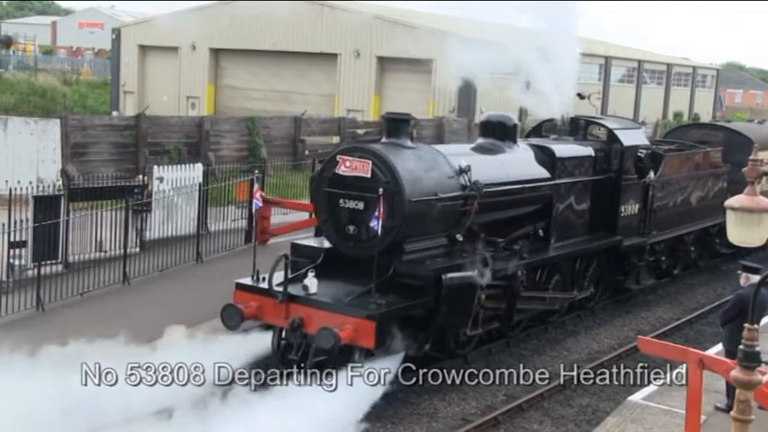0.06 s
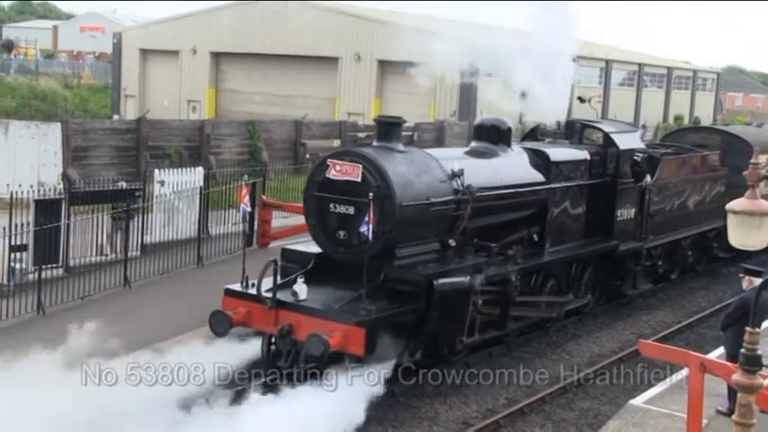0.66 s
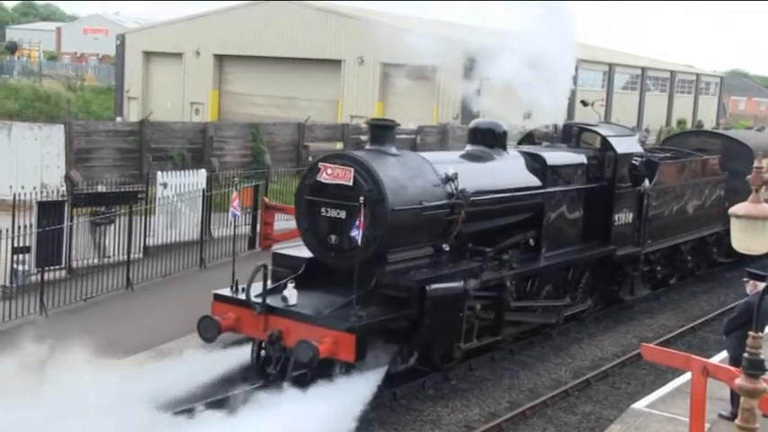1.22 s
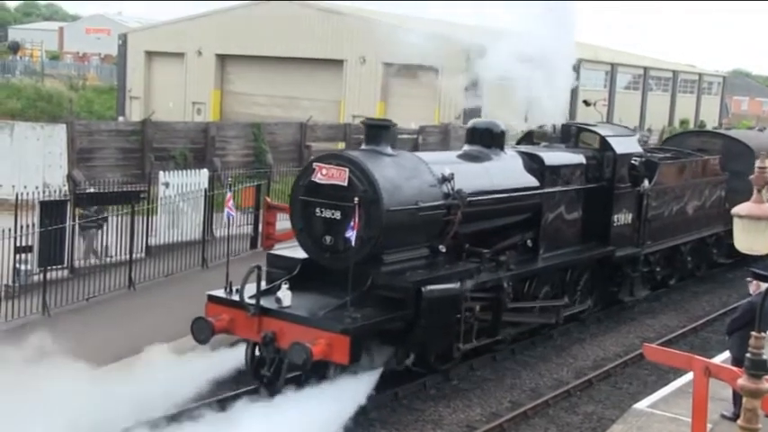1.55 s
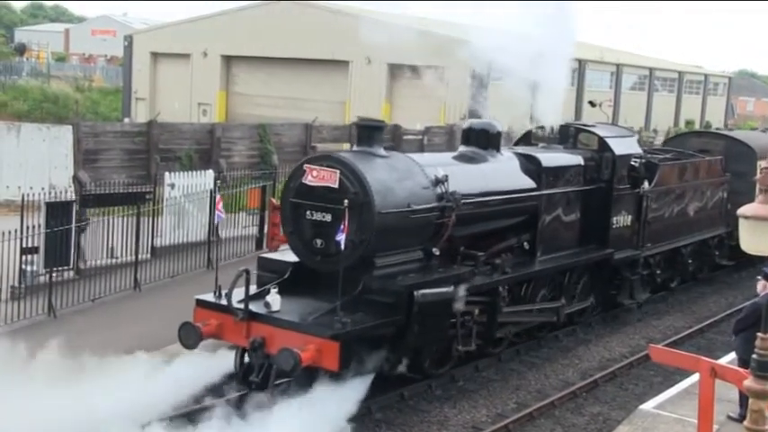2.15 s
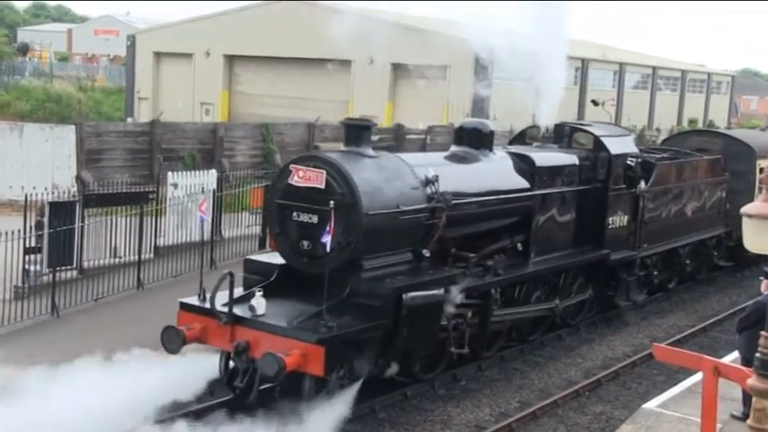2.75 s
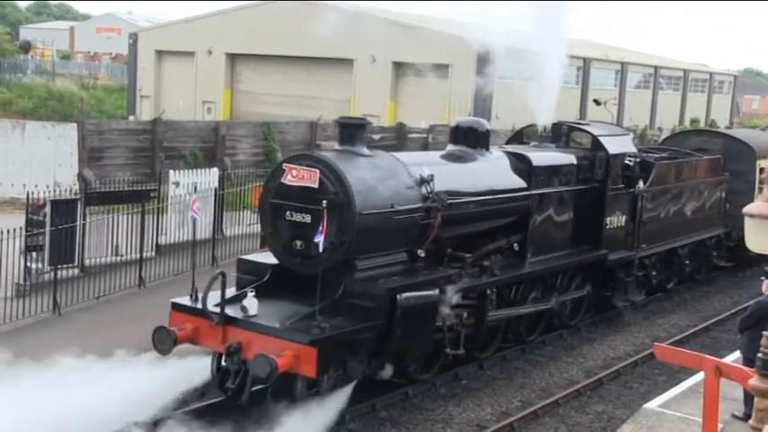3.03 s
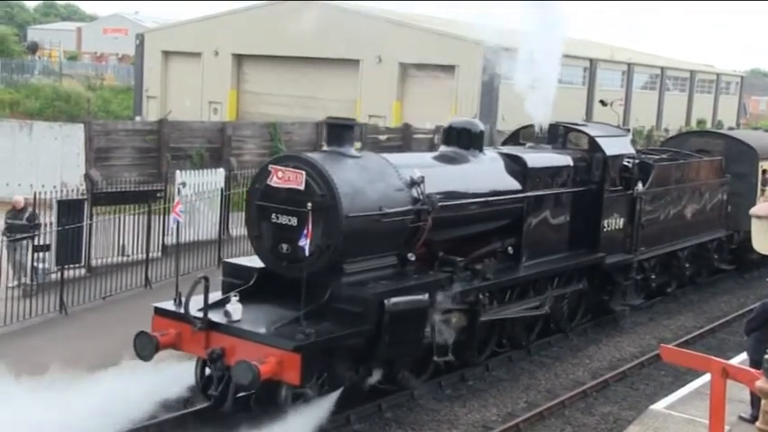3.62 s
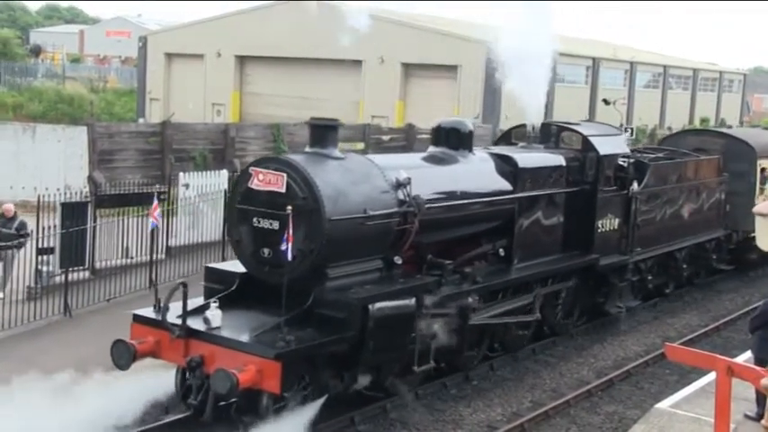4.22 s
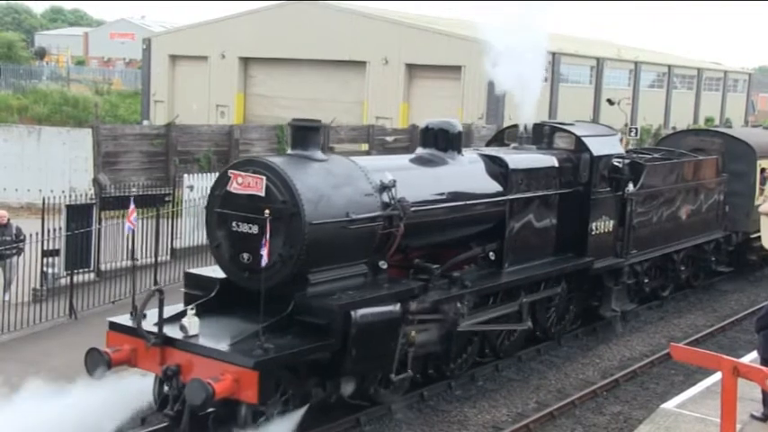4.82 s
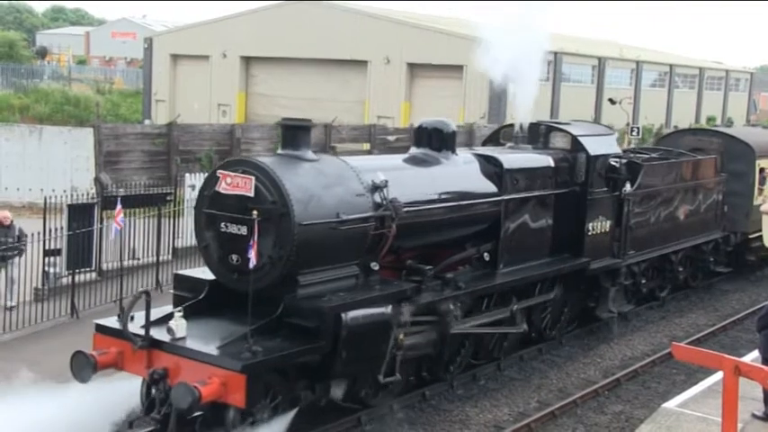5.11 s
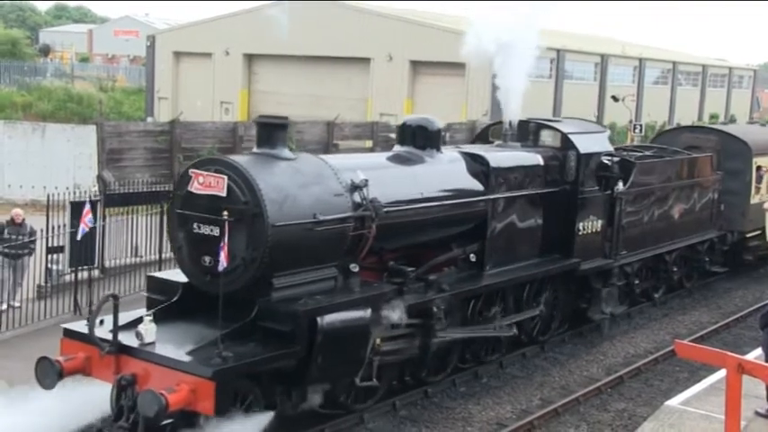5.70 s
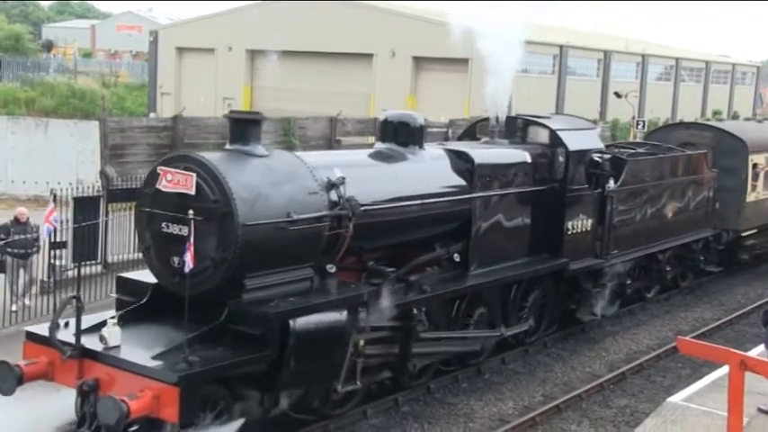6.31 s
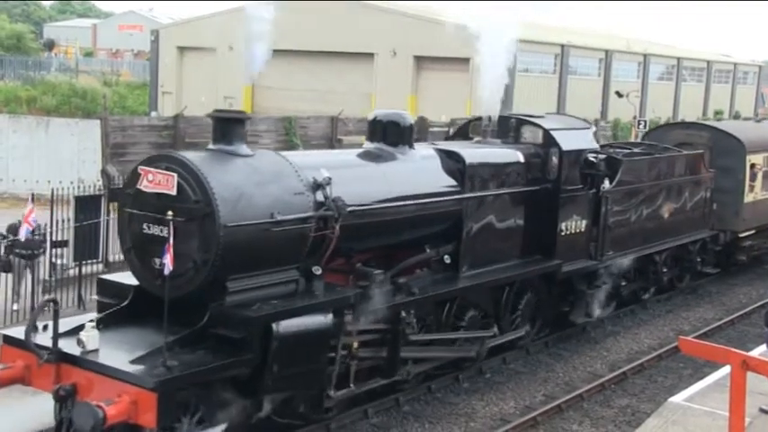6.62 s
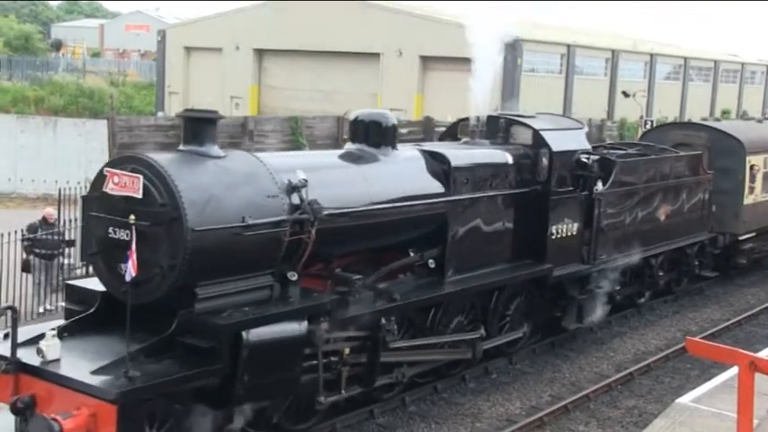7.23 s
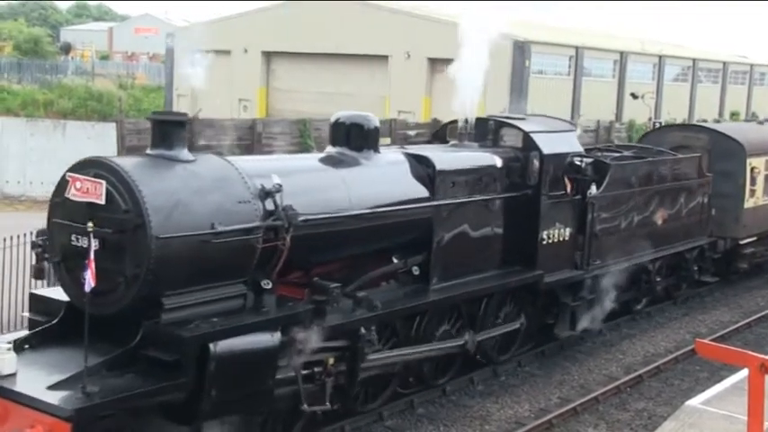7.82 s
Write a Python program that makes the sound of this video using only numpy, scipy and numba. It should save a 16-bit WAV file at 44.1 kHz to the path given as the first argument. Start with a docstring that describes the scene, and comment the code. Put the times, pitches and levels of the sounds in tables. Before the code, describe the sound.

A steam locomotive about a dozen metres away creeps out of an open-air station, its cylinder valves blowing a loud, bright hiss throughout. The hiss shifts in tone, with gushes of fine spray and faint breathy whistles. Underneath, wheels rumble quietly and the chimney gives a few slow puffs, one clearly stronger past the middle. In the second half, loose rods knock hollowly and a faint pipe howl wavers and sinks.

```python
"""A loud hiss of steam comes first: a locomotive a dozen metres away creeps out of a station.
Its drain cocks (valves that blow water out of the cylinders) are open. Each piston stroke hands the
blast to another cock, and each jet takes its own tone from the track stones and the platform.
Under the hiss, wheels rumble, steam howls in a pipe at a mostly sinking pitch, loose rods and
axleboxes knock hollowly, and slow puffs leave the chimney."""
import sys
import numpy as np
from scipy import signal
from scipy.fft import rfft, irfft, next_fast_len
from scipy.io import wavfile
from numba import njit

SR = 44100
rng = np.random.default_rng(int(sys.argv[2]) if len(sys.argv) > 2 else 0)


def master(y):
    """Save y as 16-bit WAV."""
    cut = np.clip(np.atleast_2d(y).T, -1, 1)
    pcm = np.round(cut * 32767)  # scale
    wavfile.write(sys.argv[1], SR, pcm.astype(np.int16))


N = 355446
TIME = np.arange(N) / SR
FFT_SIZE = next_fast_len(N, True)
FREQ = np.maximum(np.arange(FFT_SIZE // 2 + 1) * SR / FFT_SIZE, 1)

# how the two sides differ: f/Hz, left minus right/dB, left phase lead/rad, scattered sound/dB
STEREO = [(30, 0, 0, -14), (100, -0.58, 0.11, -21), (300, -1, -0.29, -25), (696, -1.7, 0.37, -10),
          (1100, 0, 0.12, -16.5), (2220, 2, 0.18, -6.5), (2600, -1, 0.52, -8), (4270, -2.5, 0.13, -12),
          (5540, -4.5, 0.52, -10), (6700, -1, 0.77, -14), (9100, -2, 1, -20), (9600, 3.5, -0.043, -5.5),
          (12000, 4, -0.86, -16), (15000, -0.5, -0.23, -19)]
# tone of the wheel rumble: f/Hz, level/dB
RUMBLE_TONE = [(25, -31), (50, -14), (100, -4), (160, 0.5), (230, -4.5), (310, 3.5), (550, 1.5), (800, -15),
               (1500, -42)]
# rise and fall of the rumble: t/s, relative level/dB
RUMBLE_LEVEL = [(0, -61), (2.1, -59), (2.55, -50.5), (3.1, -48), (4.7, -49.5), (5.75, -42.5), (6.15, -50.5),
                (7.35, -52.5), (7.7, -43.5)]
# pitch of the howling pipe: t/s, f/Hz
HOWL_PITCH = [(4.4, 435), (5.15, 486), (6.3, 386), (6.95, 405), (7.55, 338)]
# knocks of rods and axleboxes: t/s, level/dB, boom f/Hz, thud compared with boom/dB
KNOCKS = [(3.96, -43, 240, 2), (4.42, -40, 198, 5.5), (4.93, -46, 203, -12), (5.29, -35.5, 225, -2),
          (5.38, -33, 229, -16), (6.06, -47, 203, -7), (6.58, -42, 236, -13), (6.95, -47, 205, -13),
          (7.26, -50, 204, -12), (7.72, -35.5, 231, -14), (8.02, -26, 334, -1)]
# tone of a knock's dull thud: f/Hz, level/dB
THUD_TONE = [(35, -18), (80, 4), (130, -3), (300, 2), (600, 3), (1500, -10)]
# puffs from the chimney: t/s, level/dB
PUFFS = [(2.45, -46), (3.9, -39), (5.715, -18), (7.68, -37)]
# tone of a puff: f/Hz, level/dB
PUFF_TONE = [(40, -26), (90, -12), (200, -6), (300, -4.5), (480, 3), (700, -4), (1100, 8.5), (1700, -5),
             (2400, 6), (4500, -13), (9000, -26)]
# tone of a steam jet in open air: f/Hz, level/dB
JET_TONE = [(120, -46), (230, -46.5), (320, -30), (600, -18), (950, -14.5), (1700, -13), (3000, -9),
            (4200, 2.5), (5500, 4.5), (7000, -1.5), (9000, -11.5), (12000, -16), (15500, -23.5)]
# peaks and dips that nozzle and ground give each of the seven jets: f/Hz, width/Hz, level/dB
JET_1 = [(570, 155, -5.5), (790, 130, 3.5), (1110, 68, 6), (1256, 55, -7), (1440, 88, 5), (3500, 590, 4.5),
         (6500, 750, 3.5), (12800, 1100, 6.5), (15500, 700, -5)]
JET_2 = [(960, 120, 4), (1470, 67, 3), (3280, 450, 5), (3850, 100, 0), (6300, 1900, 4.5), (13000, 1000, 3)]
JET_3 = [(1020, 150, 4.5), (1780, 120, -6.5), (3080, 500, -1), (4380, 230, 4), (11100, 1600, 2.5)]
JET_4 = [(910, 220, 4.5), (1320, 62, 7), (2230, 290, 4.5), (4380, 670, 4), (6920, 490, 4.5),
         (9000, 840, -2.5)]
JET_5 = [(1274, 49, 8), (1650, 580, -5), (2870, 340, -5.5), (5880, 260, -0.5), (8000, 720, 1)]
JET_6 = [(660, 90, -2), (1130, 120, 6), (1760, 59, -8), (2130, 260, 4), (2860, 320, -4.5),
         (4270, 1500, 3.5), (5060, 150, -7.5), (5820, 240, 4), (10970, 800, 3.5)]
JET_7 = [(1280, 400, 1.5), (1700, 200, -3.5), (2470, 550, -2), (4960, 250, 1), (8700, 1900, 3),
         (14500, 3400, -2)]
# jets in turn: t/s, handover/s, off-centre factor, scatter factor, left minus right/dB, peaks and dips
TURNS = [(-0.5, 0.078, 0.61, 0.64, -0.6, JET_1), (1.53, 0.6, 0.67, 0.74, 0, JET_2),
         (2.5, 0.33, 0.98, 1.12, 0.5, JET_3), (4, 0.51, 0.95, 0.85, 0, JET_4),
         (5, 0.41, 0.66, 1.5, 1, JET_5), (6, 0.34, 1.46, 0.64, 0, JET_6),
         (7.5, 0.29, 0.38, 1.8, 1.5, JET_7)]
# low roar of the steam cloud: t/s, level/dB
ROAR_LEVEL = [(0, -27.5), (2.3, -30.5), (3.3, -26), (4.1, -23), (4.55, -25.5), (5.3, -23), (5.9, -23.5),
              (7.55, -29.5), (8.06, -25)]
# hiss of the jet's core, which follows the cylinder pressure: t/s, relative level/dB
HISS_LEVEL = [(0.06, -13.5), (0.68, -15), (1.63, -15.5), (2.36, -18.5), (2.45, -21), (2.67, -19),
              (2.73, -16.5), (3.66, -17.5), (4.31, -13.5), (4.41, -17.5), (4.57, -15), (5.08, -18.5),
              (5.79, -15.5), (5.83, -13.5), (5.9, -14.5), (7.18, -16.5), (7.6, -24), (8.0, -18.5)]
# gushes of water, about one per piston stroke: middle t/s, length/s, spray level/dB
GUSHES = [(.2, 0.68, -29), (1.45, 1.56, -30), (3.13, 0.72, -28), (5.616, 0.9, -28), (6.8, 0.92, -32.5),
          (8.1, 0.55, -29)]
# breathy whistles at the nozzle: middle t/s, length/s, f/Hz, level compared with hiss/dB
WHISTLES = [(.05, 0.55, 6300, -12), (2.15, .55, 5290, -7), (2.72, .18, 4160, -1), (2.95, 0.26, 4610, -4),
            (3.95, .4, 4400, -8), (4.83, 0.56, 4730, -6.5), (5.47, .18, 5780, -5), (6.202, .3, 4550, -5),
            (7.13, 0.42, 5620, -6), (7.72, .45, 4950, -5)]


def undb(db):
    """Turn decibels into a gain."""
    return 10 ** (np.asarray(db) / 20)


def over_time(rows):
    """Join (time, value) points into one value per sample."""
    return np.interp(TIME, *np.transpose(rows))


def over_freq(rows):
    """Join each column's points into a curve along a log-frequency axis."""
    hz, *columns = np.transpose(rows)
    return [np.interp(np.log(FREQ), np.log(hz), column) for column in columns]


def white():
    """The spectrum of fresh white noise."""
    return rfft(rng.standard_normal(FFT_SIZE))


def stereo_noise(off_centre=1, scatter=1, pan_db=0):
    """A left and right noise spectrum: one direct wave plus reflections from the station."""
    tilt_db, lead, scatter_db = over_freq(STEREO)
    sides = np.array([[1], [-1]])
    direction = undb(sides * (tilt_db + pan_db) / 2) * np.exp(.5j * sides * lead * off_centre)
    return direction * (white() + sides * scatter * undb(scatter_db) * white())


def to_wave(spectrum):
    """Turn a stereo spectrum into a wave; the average of its two sides has strength (rms) 1."""
    wave = irfft(spectrum, FFT_SIZE)[:, :N]
    return wave / np.std(wave.mean(axis=0))


def shaped_noise(tone):
    """Steady stereo noise with the given tone."""
    return to_wave(stereo_noise() * undb(over_freq(tone)[0]))


def wander(rate_hz):
    """A smooth random wobble of typical size 1, mostly slower than rate_hz."""
    wobble = irfft(white() / (1 + (FREQ / rate_hz) ** 4), FFT_SIZE)[:N]
    return wobble / np.std(wobble)


def swell(start, rise_s, decay_s):
    """A loudness curve that builds smoothly and dies away."""
    age = TIME - start
    attack = np.sin(np.pi / 2 * np.clip(age / rise_s, 0, 1)) ** 2
    return attack * np.exp(-np.maximum(age - rise_s, 0) / decay_s)


def arch(middle, length, squareness=2):
    """A hump that stays above half power for its length; squareness 2 is a bell, more is flatter."""
    return .5 ** (.5 * np.abs(2 * (TIME - middle) / length) ** squareness)


@njit
def resonate(x, hz, width_hz):
    """A filter that lets through a band around a moving pitch."""
    out, band_state, low_state = np.empty(len(x)), 0., 0.
    for i in range(len(x)):
        step, damping = np.tan(np.pi * hz[i] / SR), width_hz / hz[i]
        band = (band_state + step * (x[i] - low_state)) / (1 + step * (step + damping))
        band_state = 2 * band - band_state
        low_state += 2 * step * band
        out[i] = damping * band
    return out


def wheel_rumble(boost_db=5, uneven_db=1):
    """Steel wheels grind slowly along uneven rail."""
    return shaped_noise(RUMBLE_TONE) * undb(over_time(RUMBLE_LEVEL) + boost_db + uneven_db * wander(15))


def pipe_howl(start_s=4.38, end_s=7.68, rise_s=0.058, release_s=0.21, width_hz=130., growth_db_per_s=.7):
    """Rushing steam makes a pipe ring; the broad note wavers and sinks as it slowly gets louder."""
    hz = over_time(HOWL_PITCH) * (1 + 0.028 * wander(8.1))
    flow = to_wave(stereo_noise())
    howl = np.array([resonate(resonate(side, hz, width_hz), hz, width_hz) for side in flow])
    level_db = -38 + growth_db_per_s * (TIME - start_s) + 0.3 * wander(5.6)
    fade = np.clip((TIME - start_s) / rise_s, 0, 1) * np.clip((end_s - TIME) / release_s, 0, 1)
    return howl / np.std(howl) * undb(level_db) * fade


def gear_knocks(boom_width_hz=38, rise_s=0.037):
    """Rods and axleboxes take up their slack: a dull thud, and the hollow metal plates boom."""
    thud_noise = shaped_noise(THUD_TONE)
    shake, out = stereo_noise(), 0
    for start, db, hz, thud_db in KNOCKS:
        ringing = to_wave(shake / (1 + ((FREQ - hz) / boom_width_hz) ** 2))
        boom = ringing * swell(start, rise_s, decay_s=0.084)
        thud = undb(thud_db) * thud_noise * swell(start, rise_s, decay_s=0.19)
        out = out + undb(db) * (boom + thud)
    return out


def chimney_puffs():
    """Each puff is a soft-edged gust of used steam going up the chimney."""
    gusts = sum(undb(db) * swell(start, rise_s=0.074, decay_s=0.18) for start, db in PUFFS)
    return gusts * shaped_noise(PUFF_TONE)


def nozzle_whistles(hiss, width_hz=240., sag_hz_per_s=430):
    """The jet half-sings on the cock's edge; notes sag with the pressure and take power from the hiss."""
    flow = to_wave(stereo_noise(scatter=0.78))
    out, power = hiss, 1
    for middle, length, hz, db in WHISTLES:
        pitch = hz - sag_hz_per_s * np.clip(TIME - middle, -length, length)
        note = np.array([resonate(side, pitch, width_hz) for side in flow])
        gain = undb(db) * arch(middle, length)
        out = out + gain * note / np.std(note)
        power = power + gain ** 2
    return out / np.sqrt(power)


def near_echoes(steam, count=12, gain=.075):
    """Frames, rails and platform wall echo the jet; the delays drift as the engine moves."""
    delays_s = rng.uniform(.0015, .009, count)
    drifts = rng.uniform(-.00025, .00025, count)
    echoes = 0
    for delay, drift in zip(delays_s, drifts):
        earlier = TIME - delay - drift * (TIME - TIME.mean())
        echoes = echoes + np.array([np.interp(earlier, TIME, side, 0, 0) for side in steam])
    return (steam + gain * echoes) / np.sqrt(1 + count * gain ** 2)


def steam_jets(roar_edge_hz=2900, spray_edge_hz=8500):
    """Jets take over from one another; their noise comes back as low, middle and high bands."""
    jet_db, = over_freq(JET_TONE)
    low = 1 / (1 + (FREQ / roar_edge_hz) ** 16)
    high = 1 / (1 + (spray_edge_hz / FREQ) ** 20)
    filters = np.sqrt([low, np.clip(1 - low - high, 0, 1), high])
    opened = [.5 + .5 * np.tanh(2 * (TIME - start) / handover) for start, handover, *_ in TURNS] + [0]
    bands = np.zeros((3, 2, N))
    for k, (_, _, off_centre, scatter, pan_db, peaks) in enumerate(TURNS):
        peaks_db = sum(db * np.exp(-((FREQ - hz) / width) ** 2) for hz, width, db in peaks)
        jet = stereo_noise(off_centre, scatter, pan_db) * undb(jet_db + peaks_db)
        share = np.sqrt(np.maximum(opened[k] - opened[k + 1], 0))  # fades as the next cock opens
        bands += share * np.array([to_wave(jet * band) for band in filters])
    return bands


def drain_cocks(hiss_trim_db=-0.7, dry_spray_db=-21.5, flutter_db=0.37, surge_db=0.38, spit_db=0.2):
    """Escaping steam: its cloud roars, its core hisses and its water drops make a fine spray."""
    roar, hiss, spray = steam_jets()
    hiss = nozzle_whistles(hiss)
    roar_gain = undb(over_time(ROAR_LEVEL))
    hiss_gain = undb(over_time(HISS_LEVEL) + hiss_trim_db)
    gush_power = sum((undb(db) * arch(t, length, squareness=2.36)) ** 2 for t, length, db in GUSHES)
    spray_gain = np.sqrt(gush_power + (hiss_gain * undb(dry_spray_db)) ** 2)
    layers = (roar * roar_gain, hiss * hiss_gain, spray * spray_gain)
    # swirls shake each layer on its own; slugs of water make the whole jet surge and spit
    steam = sum(layer * undb(flutter_db * wander(30)) for layer in layers)
    return near_echoes(steam) * undb(surge_db * wander(23) + spit_db * wander(110))


def scene():
    """The whole locomotive: the steam jets on top of four quieter sounds."""
    return drain_cocks() + chimney_puffs() + gear_knocks() + wheel_rumble() + pipe_howl()


def record(dry, ceiling=.97, top_hz=15850):
    """Round off the very highest peaks and steeply cut the top of the treble."""
    rounded = dry / (1 + (dry / ceiling) ** 12) ** (1 / 12)
    return signal.sosfilt(signal.ellip(12, .1, 80, top_hz, fs=SR, output="sos"), rounded)


dry = scene()
out = record(dry)
master(out)
```